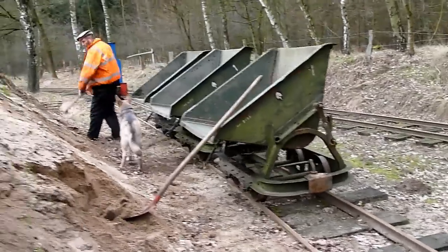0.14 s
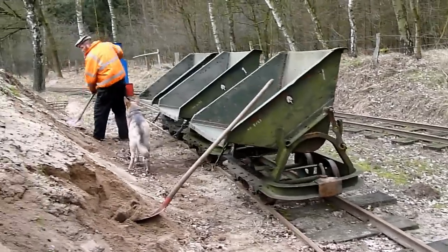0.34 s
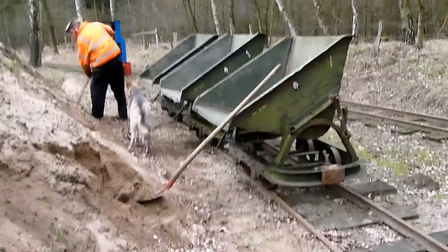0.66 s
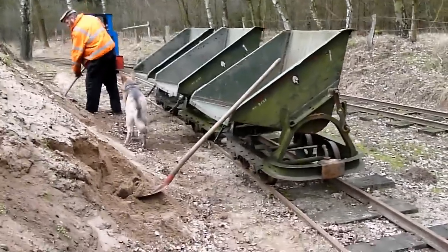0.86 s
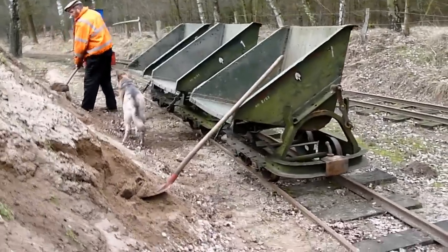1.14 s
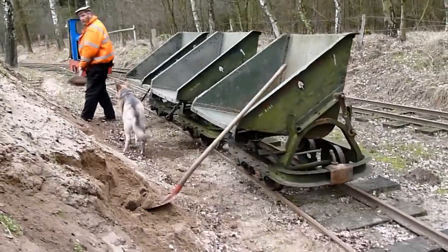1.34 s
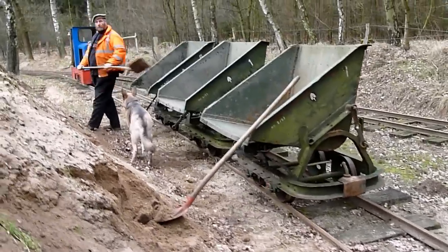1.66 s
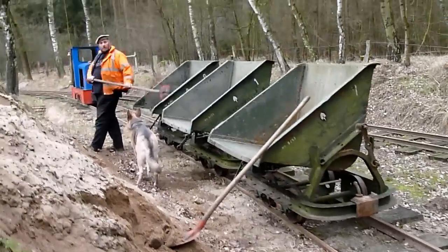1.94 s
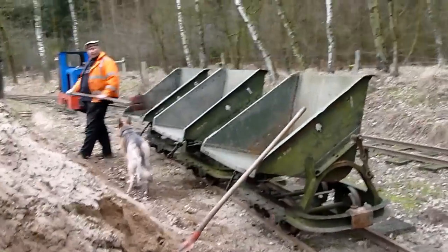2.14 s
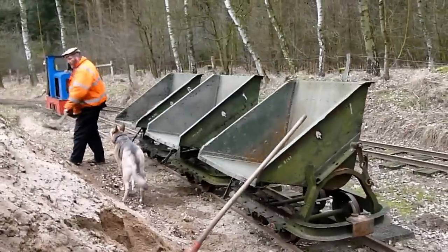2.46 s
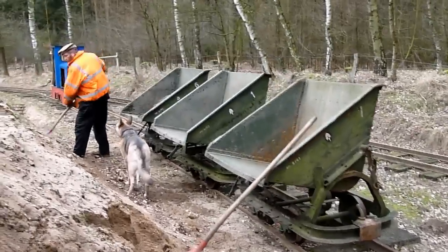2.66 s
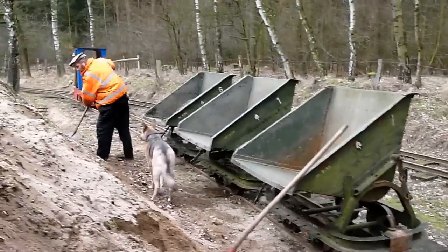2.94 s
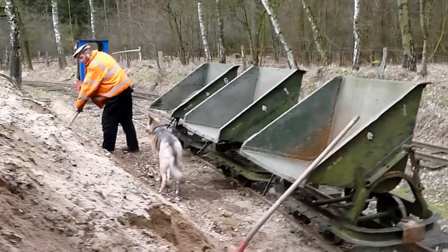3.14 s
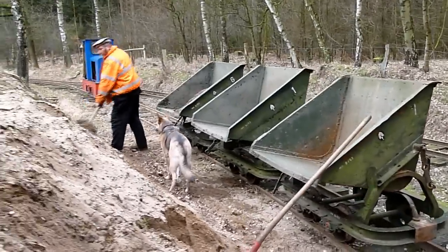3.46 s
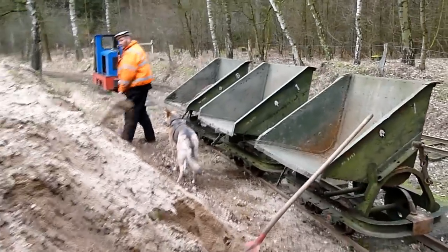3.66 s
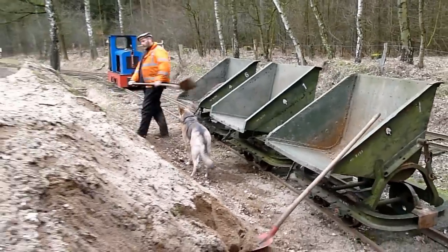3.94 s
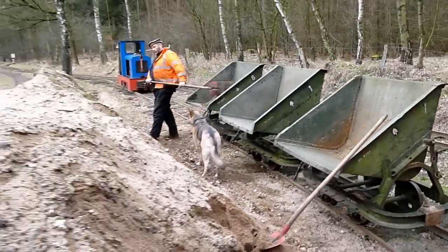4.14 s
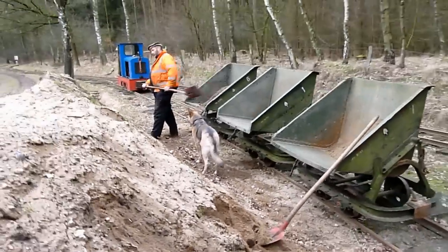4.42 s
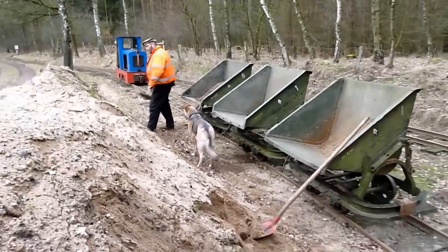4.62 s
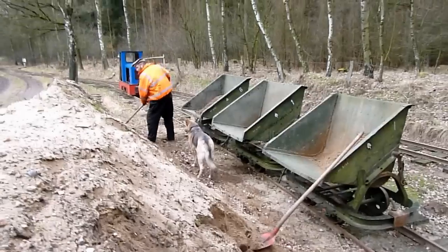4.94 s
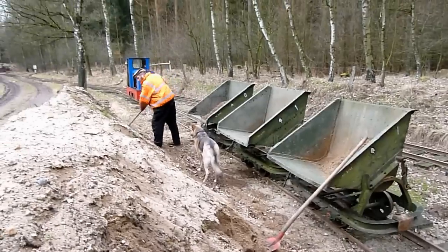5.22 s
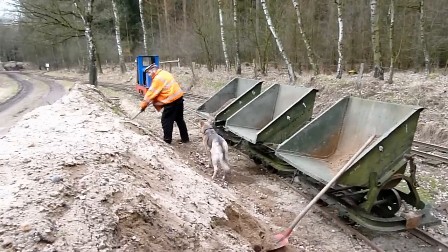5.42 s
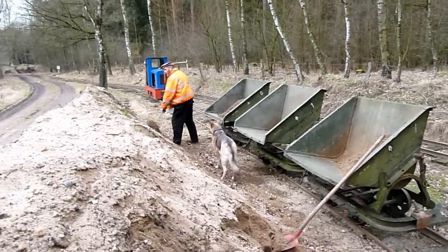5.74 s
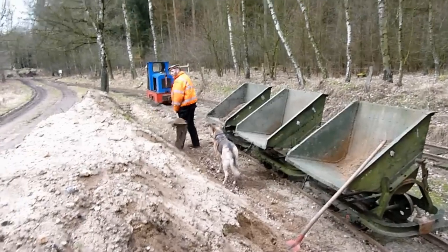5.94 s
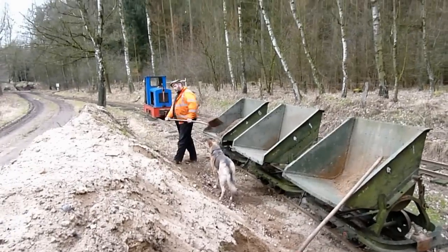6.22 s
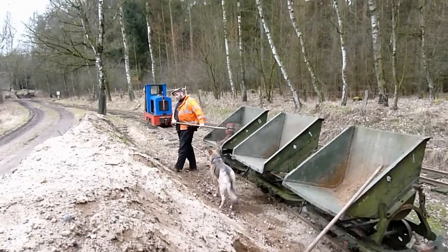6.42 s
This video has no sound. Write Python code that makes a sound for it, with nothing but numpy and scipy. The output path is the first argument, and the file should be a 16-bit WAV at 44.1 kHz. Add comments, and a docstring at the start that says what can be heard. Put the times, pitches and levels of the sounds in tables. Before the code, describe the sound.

Outdoor shovelling: sharp gritty stabs, sand sliding off the blade and slapping into steel tubs, with boot thuds and one hollow boom.

```python
"""A man shovels gritty sand into steel tipper wagons at the edge of a wood, some metres away.
It opens on soft wind and a faint hum that soon fades. At 0.7 s the blade skids on stones and crunches
into the heap; near 2 s the load hisses off it and slaps into a wagon. Boots thud, and a second shovelful
starts at 3.1 s. At 4.9 s a wagon's tub is knocked and booms; the third shovelful follows at 5.3 s.
Throughout, wagons and trees scatter the impacts back."""
import sys
import numpy as np
from scipy import signal
from scipy.fft import rfft, irfft
from scipy.io import wavfile
from scipy.ndimage import uniform_filter1d

SR = 44100
rng = np.random.default_rng(int(sys.argv[2]) if len(sys.argv) > 2 else 0)


def master_out(mix):
    """Clip the mix to full scale and print it as 16-bit PCM to the path in sys.argv[1]."""
    frames = np.transpose(np.atleast_2d(mix))
    ceiling = np.clip(frames, -1, 1)
    pcm = np.round(ceiling * 32767).astype(np.int16)
    wavfile.write(sys.argv[1], SR, pcm)


N = 290178
TIME = np.arange(N) / SR


def amp(db):
    """Decibels to gain."""
    return 10 ** (np.asarray(db) / 20)


def unit(x):
    """Scales to rms 1."""
    return x / np.sqrt(np.mean(x ** 2) + 1e-20)


def wander(samples):
    """Smoothed noise at rms 1."""
    return unit(uniform_filter1d(rng.standard_normal(N), size=samples))


def curve_at(points, hz):
    """Interpolates on a log-frequency axis."""
    freq_hz, value = np.transpose(points)
    return np.interp(np.log(hz + 1), np.log(freq_hz), value)


def add(mix, start_s, sound):
    """Adds a sound to the mix in place."""
    part = mix[..., max(round(start_s * SR), 0):][..., :sound.shape[-1]]
    part += sound[..., :part.shape[-1]]


def colour(x, spectrum, tilt_db_oct=0):
    """Gives noise a tilted spectrum, at rms 1."""
    hz = np.fft.rfftfreq(x.shape[-1], 1 / SR)
    gain = amp(curve_at(spectrum, hz) + tilt_db_oct * np.log2(hz + 1))
    return unit(irfft(rfft(x) * gain, x.shape[-1]))


def grains(per_s, spread_db, width, size=N):
    """Stereo patter of uneven grains; width is side over mid."""
    hits = (rng.random((2, size)) < per_s / SR) * rng.standard_normal((2, size))
    mid, side = hits * amp(spread_db * np.minimum(rng.exponential(1, (2, size)), 4))
    return unit(np.array([mid + width * side, mid - width * side]))


def swell(peak_s, rise_s, fall_s):
    """Exponential rise and fall around a peak."""
    return np.exp(-np.maximum((peak_s - TIME) / rise_s, (TIME - peak_s) / fall_s))


def ring(modes, length_s, tilt_db_oct=0):
    """Impulse response of modes with alternating signs, at energy 1."""
    t = np.arange(int(length_s * SR)) / SR
    response = sum((-1) ** k * amp(db + tilt_db_oct * np.log2(hz) - 60 * t / t60_s)
                   * np.sin(2 * np.pi * hz * t) for k, (hz, db, t60_s) in enumerate(modes))
    return response / np.linalg.norm(response)


def convolve(x, response):
    """Convolves along time, up to N samples."""
    return signal.fftconvolve(np.atleast_2d(x), np.atleast_2d(response), axes=1)[:, :N]


# wind spectrum: freq_hz, level_db
WIND_SPECTRUM = [(15, -19), (30, -6.5), (65, -5.5), (155, -6.5), (250, -2.5), (420, -3), (600, -3.5),
                 (1100, -7), (1700, -13), (2500, -15), (6000, -16.5), (16000, -24)]
# wind strength: time_s, level_db
WIND_LEVEL = [(0, -49), (1.2, -48.5), (2.3, -48), (3.6, -48.5), (4.6, -49.5), (5.7, -50.5), (6.58, -47.5)]
# left-right likeness of the wind: freq_hz, correlation
WIND_CORRELATION = [(50, 0.92), (200, 0.87), (500, 0.82), (1000, 0.5), (2000, 0), (5000, 0), (16000, 0.22)]


def wind(waver_db=1.14):
    """Soft wind in the trees, nearly mono in the bass."""
    correlation = curve_at(WIND_CORRELATION, np.fft.rfftfreq(N, 1 / SR))
    mid, side = rfft(rng.standard_normal((2, N))) * np.sqrt([1 + correlation, 1 - correlation])
    air = colour(irfft(np.array([mid + side, mid - side]), N), WIND_SPECTRUM)
    level_db = np.interp(TIME, *np.transpose(WIND_LEVEL)) + waver_db * wander(4000)
    return air * amp(level_db) * amp([[-.3], [.3]])


def hum(pitch_hz=254, level_db=-60, fade_s=1.9):
    """A faint far hum wavers and fades."""
    hz = pitch_hz * (1 + 0.015 * wander(3000))
    return amp(level_db) * np.sin(2 * np.pi * np.cumsum(hz) / SR) / (1 + (TIME / fade_s) ** 8)


# echo decay: freq_hz, t60_s
WOOD_DECAY = [(150, 0.23), (1000, 0.66), (3200, 0.72), (7000, 0.55), (10000, 0.43), (15000, 0.21)]


def wood_echo(x, build_s=0.004, positions=3):
    """Wagons and trunks scatter sound, treble dying first; the paths change as the listener walks."""
    t, out = np.arange(SR) / SR, np.zeros((2, N))
    for k in range(positions):
        taps = rng.standard_normal((2, SR)) * (rng.random((2, SR)) < .15) * (1 - np.exp(-t / build_s))
        hz, frame_s, spectra = signal.stft(taps, SR, nperseg=256)
        decay = amp(-60 * frame_s / curve_at(WOOD_DECAY, hz)[:, None])
        tail = signal.istft(spectra * decay, SR, nperseg=256)[1]
        share = np.clip(1 - abs(TIME / TIME[-1] * (positions - 1) - k), 0, 1)
        out += convolve(x.mean(0) * np.sqrt(share), tail / np.linalg.norm(tail[0]))
    return out


# steel sheet modes: freq_hz, level_db, t60_s
SHEET_MODES = [(1310, -6, .25), (2380, -2, .15), (2922, -1, .35), (3095, 0, .25), (3357, -1, .3),
               (3468, 0, .3), (4373, -1, .15), (6619, -2, .2), (7770, -2, .15), (8890, -4, .2),
               (9310, -4, .2)]


def sheet_ring(sand, gain_db=-26):
    """Sand excites a thin, lasting ring in the steel."""
    return convolve(amp(gain_db) * sand, ring(SHEET_MODES, length_s=.6))


# pebble ticks: peak_s, level_db
PEBBLES = [(.44, -49), (2.595, -46), (2.8657, -44), (3.3115, -31), (3.445, -44), (4.407, -41),
           (6.194, -39.5), (6.316, -45)]


def pebbles():
    """Stray stones tick briefly."""
    envelope = sum(amp(db) * swell(peak_s, .0005, .003) for peak_s, db in PEBBLES)
    grit = grains(per_s=9600, spread_db=2.5, width=0.57)
    return envelope * colour(grit, CRUNCH_SPECTRUM, tilt_db_oct=-3)


def push(peak_s, hz, length_s, sag=0.28):
    """A short pulse whose pitch sinks as the ground yields."""
    age = np.clip((TIME - peak_s) / length_s, -6, 12)
    cycles = hz * length_s * (1 - np.exp(-sag * age)) / sag
    return np.sin(2 * np.pi * cycles) * np.exp(1 - np.exp(-age) - age)


# ground thuds: peak_s, level_db, pitch_hz, tap_db, scuff_db
THUDS = [(0.711, -37, 150, -20, -20), (1.553, -43, 704, -8, 3), (1.8114, -27, 235, -12, -17),
         (2.252, -35.5, 600, -10, -5.5), (2.275, -37, 700, -10, -7), (2.302, -39.5, 875, -10, -2),
         (2.8543, -32, 260, -1, -7), (2.9796, -33.5, 260, 16, -6.5), (3.109, -23.5, 360, -20, -14),
         (3.349, -43, 420, -10, 3), (3.4461, -24, 364, -2.5, -20), (4.661, -36.5, 620, -6, -10),
         (4.816, -37.5, 340, -10, -1), (4.827, -34, 240, -10, -8), (5.265, -37.5, 414, -10, -9)]
# scuffed grit: freq_hz, level_db
SCUFF_SPECTRUM = [(100, -14), (400, 2.5), (1000, -2.5), (2000, -5), (3200, -11), (6000, -16.5),
                  (15000, -23)]


def thuds(push_cycles=0.55, tap_lead_s=0.00164):
    """Boots and blade tap hard, then push into soft ground with a scuff of grit."""
    out, scuff = np.zeros(N), np.zeros(N)
    for peak_s, db, hz, tap_db, scuff_db in THUDS:
        tap = amp(tap_db) * push(peak_s - tap_lead_s, hz=950, length_s=0.0002)
        out += amp(db) * (push(peak_s, hz, push_cycles / hz) + tap)
        scuff += amp(db + scuff_db) * swell(peak_s, rise_s=0.0014, fall_s=0.0075)
    return out + scuff * colour(grains(per_s=11000, spread_db=3, width=0.62), SCUFF_SPECTRUM)


# knocks on the tub: start_s, level_db, tilt_db_oct, rattle_db
KNOCKS = [(4.884, -28.5, -0.5, -2), (4.929, -35, -7, -2.5), (4.98, -42, 2, -1), (4.993, -41, 3, -11),
          (5.127, -51, -7, 7), (5.267, -47.5, -2.5, -4)]
# tub modes: freq_hz, level_db, t60_s
TUB_MODES = [(119, -1.5, 0.51), (144, 4, 0.1), (183, -9, .2), (204.8, -1, 0.44), (253, 0, 0.12),
             (351, -10, 0.34), (523, -1.5, 0.17), (624, 3, 0.14), (732, -1, 0.15), (893, -2, 0.075),
             (1030, -3.5, .06)]
# cradle rattle: freq_hz, level_db
RATTLE_SPECTRUM = [(100, 1.5), (400, -2), (1000, 1), (1600, -9.5), (3000, -5), (7000, -13.5), (15000, -32)]


def wagon_knocks():
    """The tub booms at each knock and rattles in its cradle."""
    boom, rattle = np.zeros(N), np.zeros(N)
    for start_s, db, tilt_db_oct, rattle_db in KNOCKS:
        add(boom, start_s, amp(db) * np.sqrt(0.016 * SR) * ring(TUB_MODES, 1, tilt_db_oct))
        rattle += amp(db + rattle_db) * swell(start_s + 0.00071, rise_s=0.00039, fall_s=0.018)
    return boom + rattle * colour(grains(per_s=17000, spread_db=0.5, width=0.4), RATTLE_SPECTRUM)


# shovelfuls, heap to wagon: stab_s, slump_db, throw_s, throw_db, throw_rise_s
SHOVELFULS = [(.71, -54.5, 1.95, -45, 0.12), (3.09, -53.5, 4.17, -40.5, 0.24),
              (5.32, -54.5, 6.34, -39, .16)]
# spills over the blade's edge: start_s, length_s, level_db
SPILLS = [(.3, .25, -48), (.47, .2, -62), (1.15, .52, -53.5), (2.16, .25, -55.5), (2.56, .42, -55.5),
          (3.42, .26, -54.5), (3.72, .23, -46.5), (3.93, .16, -45.5), (4.8, .04, -49), (4.895, .2, -50),
          (5.115, .04, -49), (5.86, .21, -50), (6.13, .2, -45.5)]


def sand_flow(spill_skew=.75, runoff_db=-52, runoff_lag_s=0.11, slump_delay_s=0.66):
    """Envelopes of sand leaving the blade and of grit running down heap and steel."""
    throws = [amp(db) * swell(throw_s, rise_s, fall_s=0.18) for _, _, throw_s, db, rise_s in SHOVELFULS]
    spills = [amp(db) * np.sin(np.pi * np.clip((TIME - start_s) / length_s, 0, 1) ** spill_skew) ** 2
              for start_s, length_s, db in SPILLS]
    falling = np.linalg.norm(throws + spills, axis=0)
    fallen = signal.lfilter([1], [1, -np.exp(-1 / (runoff_lag_s * SR))], falling)
    runoff = amp(runoff_db) * (fallen / fallen.max()) ** 0.42
    # the heap runs into the hole, most as the blade is drawn out
    slumps = [amp(db) * (TIME > stab_s) * swell(stab_s + slump_delay_s, rise_s=1, fall_s=0.29)
              for stab_s, db, *_ in SHOVELFULS]
    return falling, np.linalg.norm(slumps + [runoff], axis=0)


# fine sand: freq_hz, level_db
HISS_SPECTRUM = [(500, -35), (2500, -16), (5000, -5), (7000, -1), (10000, 0), (13000, 0), (15800, -1.5)]
# coarse grit: freq_hz, level_db
TRICKLE_SPECTRUM = [(300, -65), (1500, -6), (2500, -3), (4000, -4), (6000, -8), (9000, -13), (16000, -72)]


def sliding_sand(flutter_db=1.5, stones_db=-11):
    """Fine sand hisses, larger grains tick and grit trickles in an uneven flow."""
    falling, running = sand_flow()
    flutter = amp(flutter_db * wander(900))
    fine = colour(grains(per_s=25000, spread_db=-2.5, width=0.19), HISS_SPECTRUM)
    stones = amp(stones_db) * colour(grains(per_s=500, spread_db=3.5, width=0.31), CRUNCH_SPECTRUM)
    trickle = colour(grains(per_s=20000, spread_db=2, width=0.97), TRICKLE_SPECTRUM)
    return flutter * (falling * (fine + stones) + running * trickle)


def burst(peak_s, rise_s, fall_s, spectrum, width, tilt_db_oct=0, ripple_db=3.5):
    """A swell of dense grains, each burst with its own random, uneven colour."""
    size, out = SR // 2, np.zeros((2, N))
    ripple = unit(signal.resample(rng.standard_normal(SR // 300), size // 2 + 1))
    patter = grains(per_s=20000, spread_db=-0.3, width=width, size=size)
    spray = irfft(rfft(patter) * amp(ripple_db * np.minimum(ripple, 1)), size)
    add(out, peak_s - size / SR / 4, colour(spray, spectrum, tilt_db_oct))
    return out * swell(peak_s, rise_s, fall_s)


# clods landing: peak_s, level_db, fall_s, tilt_db_oct, thump_db
CLODS = [(1.895, -31.5, .048, 2, -18), (1.955, -33, .028, 1.5, -29), (1.976, -26.5, 0.013, .5, -6.5),
         (2.085, -42.5, .02, 5.5, -11), (4.145, -28.5, 0.041, -1, -10), (4.188, -27.5, 0.013, 4, -15.5),
         (6.432, -31.5, 0.022, .5, -14), (6.459, -28.5, .013, -.5, -15), (6.512, -34.5, 0.019, .5, -16)]
# sand on steel: freq_hz, level_db
SLAP_SPECTRUM = [(100, -22), (400, -13), (900, -9), (1600, -9.5), (1850, 1), (2300, 1), (3100, -1),
                 (5000, -2.5), (8000, -6), (12000, -9), (15800, -13)]
# hollow tub: freq_hz, level_db
THUMP_SPECTRUM = [(100, -23), (450, -12), (750, 5), (1000, -5), (1280, 4), (1700, -9.5), (3500, -20)]


def clods(rise_ratio=0.53):
    """Each lump bursts into a spray of grains; its weight thumps the hollow tub."""
    out = np.zeros((2, N))
    for peak_s, db, fall_s, tilt_db_oct, thump_db in CLODS:
        timing = peak_s, rise_ratio * fall_s, fall_s
        slap = burst(*timing, SLAP_SPECTRUM, width=0.2, tilt_db_oct=tilt_db_oct)
        thump = burst(*timing, THUMP_SPECTRUM, width=0.37)
        out += amp(db) * (slap + amp(thump_db) * thump)
    return out


# blade entering the heap: peak_s, level_db, fall_s, push_db
DIGS = [(.712, -21, 0.021, -17.5), (.746, -27.5, 0.043, -19), (3.073, -29, .01, -24),
        (3.085, -24, .016, -26), (3.1, -22, .03, -11), (5.329, -25.5, 0.024, -36),
        (5.348, -25.5, 0.023, -13), (5.403, -35, .03, -11.5)]
# grit and small stones: freq_hz, level_db
CRUNCH_SPECTRUM = [(200, -22), (900, -11), (1650, -11), (2200, -3), (3400, 0), (5200, -1), (7800, -.5),
                   (10500, -4), (13000, -5), (15800, -7.5)]
# yielding sand: freq_hz, level_db
PUSH_SPECTRUM = [(40, -32), (100, -4.5), (200, -4), (340, -5), (520, -6), (1200, -7), (2500, -11),
                 (6000, -47)]


def digs(rise_ratio=.29):
    """Grit grinds along the steel while the sand gives way with a dull push."""
    out = np.zeros((2, N))
    for peak_s, db, fall_s, push_db in DIGS:
        timing = peak_s, rise_ratio * fall_s, fall_s
        crunch = burst(*timing, CRUNCH_SPECTRUM, width=0.19)
        yielding = burst(*timing, PUSH_SPECTRUM, width=.2)
        out += amp(db) * (crunch + amp(push_db) * yielding)
    return out


# edge chattering on stones: start_s, level_db, slip_hz, fall_s, shove_db, tilt_db_oct
SKIDS = [(0.7096, -16, 628, 0.0029, -5, -6), (0.7127, -16, 1260, 0.0024, -12, 12),
         (3.08, -18, 1800, 0.0014, -28, 1), (3.0898, -12.5, 950, 0.0017, -13, -2.5),
         (3.0956, -23, 800, 0.0037, -17, -4), (3.1181, -24.5, 1500, 0.0022, -32, -4),
         (5.3208, -22, 1240, 0.0017, -28, 1.5), (5.3212, -8, 1400, 0.0014, -24, 1)]
# modes of the blade against a stone: freq_hz, level_db, t60_s
BLADE_MODES = [(1219, -17, 0.023), (2170, -9, 0.0043), (2520, -1, 0.0057), (3154, -6.5, 0.019),
               (4270, 0, 0.013), (5680, -1, 0.0043), (6650, 0, 0.0037), (8190, 2, 0.0074),
               (9730, -5.5, 0.0095), (10900, -6.5, 0.0054), (12700, -3.5, 0.003)]


def skids(jitter=0.039, grip_s=0.00053, grit_gain=0.097, left_db=0.6):
    """Stick-slip jolts grip, die away and ring the blade; the shove behind them gives a low knock."""
    out, t = np.zeros((2, N)), np.arange(SR // 10) / SR
    shove_age = t / 0.00061
    shove = np.cos(1.67 * shove_age) * shove_age * np.exp(-shove_age / 1.12)
    for start_s, db, slip_hz, fall_s, shove_db, tilt_db_oct in SKIDS:
        slips_s = np.cumsum(1 + jitter * rng.standard_normal(16)) / slip_hz
        slips_s -= slips_s[0]
        jolts = sum((np.exp(-s / fall_s) - .5 * np.exp(-s / grip_s)) * np.sinc((t - s) * SR)
                    for s in slips_s)
        trapped_sand = grit_gain * rng.standard_normal((2, len(t))) * np.exp(-t / fall_s)
        chatter = convolve(jolts + trapped_sand, ring(BLADE_MODES, .05, tilt_db_oct))[:, :len(t)]
        chatter *= np.sqrt(fall_s * SR) / np.linalg.norm(chatter.mean(0))
        add(out, start_s, amp(db) * (chatter + 2 * amp(shove_db) * shove))
    return out * amp([[left_db], [-left_db]])


# stereo width of the impacts: freq_hz, side_gain_db
WIDTH = [(100, -15), (500, -6.5), (1100, -9), (2200, -8.5), (4000, -2.5), (8000, 2), (15000, 3.5)]


def scene(right_db=0.3):
    """Impacts and their echo, widest in the treble, over sliding sand, wind and hum."""
    chatter, crunch = skids(), digs()
    toward_wagons = amp([[-right_db], [right_db]])
    load = toward_wagons * clods()
    steel = sheet_ring(crunch + load)
    bumps = toward_wagons * (thuds() + pebbles() + wagon_knocks())
    echo = wood_echo(amp(-18) * chatter + amp(-6.5) * crunch + amp(-11.5) * (load + bumps))
    left, right = chatter + crunch + load + steel + bumps + echo
    side_gain = amp(curve_at(WIDTH, np.fft.rfftfreq(N, 1 / SR)))
    side = irfft(rfft((left - right) / 2) * side_gain, N)
    impacts = (left + right) / 2 + np.array([side, -side])
    return impacts + toward_wagons * sliding_sand() + wind() + hum()


def record(dry, low_cut_hz=37, ceiling=0.74, high_cut_hz=15950):
    """High-pass, soft clip, low-pass."""
    thin = signal.sosfilt(signal.butter(2, low_cut_hz, "highpass", fs=SR, output="sos"), dry)
    rounded = thin / (1 + (thin / ceiling) ** 8) ** (1 / 8)
    lowpass = signal.firwin(511, high_cut_hz, window=("kaiser", 9), fs=SR)
    return signal.oaconvolve(rounded, lowpass[None], "same")


dry = scene()
out = record(dry)
master_out(out)
```